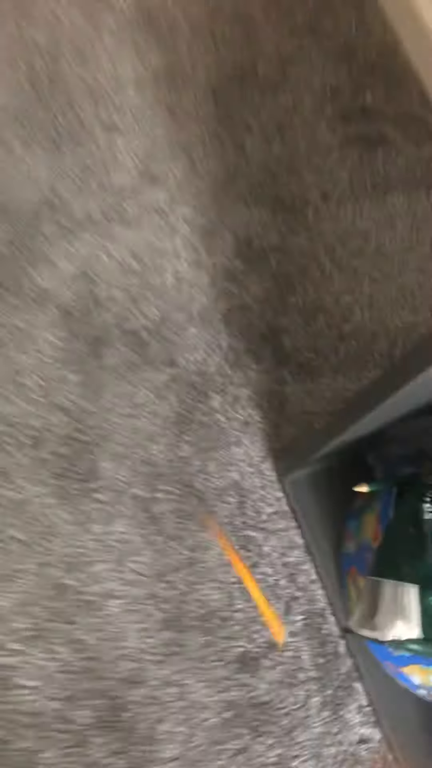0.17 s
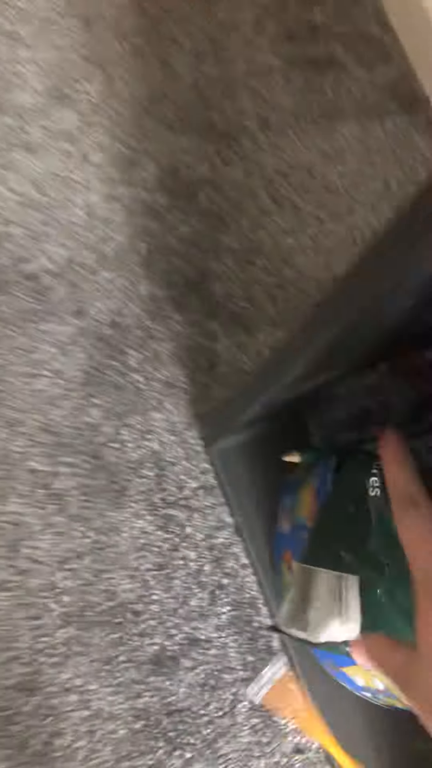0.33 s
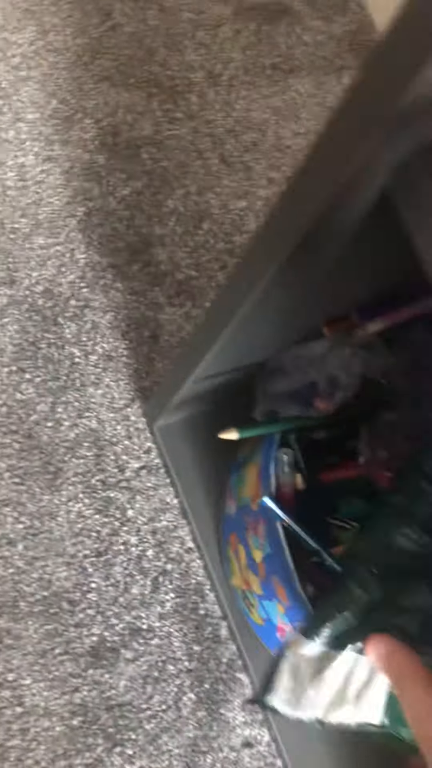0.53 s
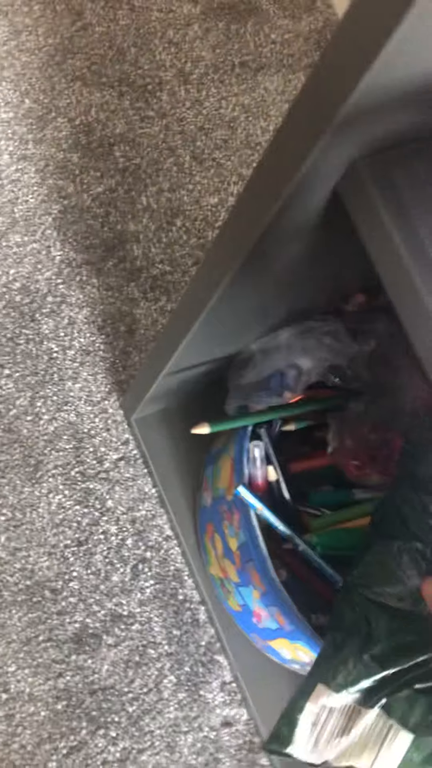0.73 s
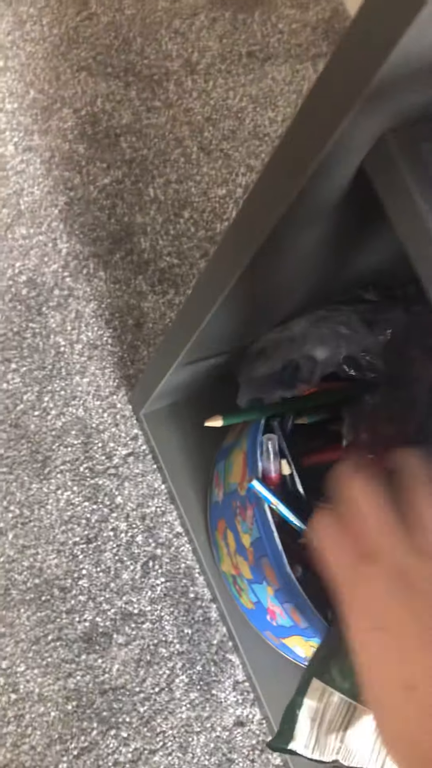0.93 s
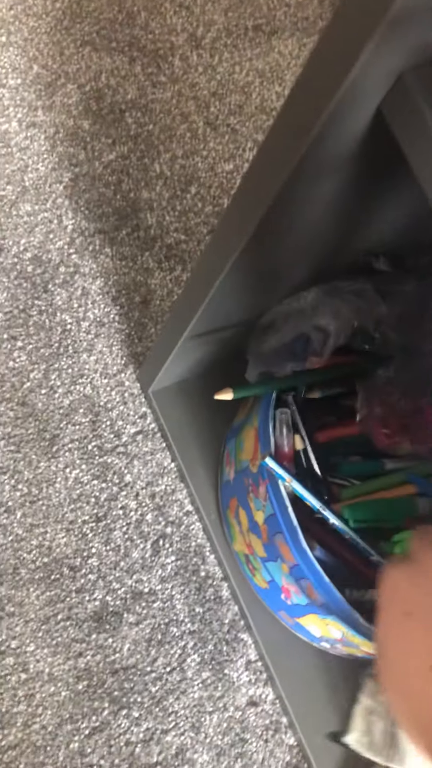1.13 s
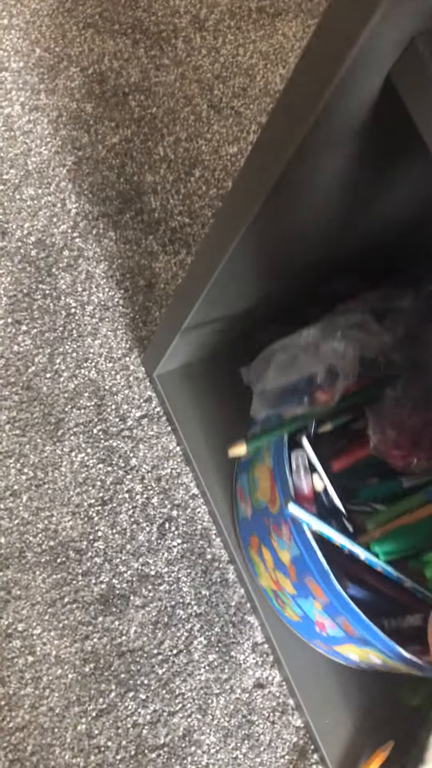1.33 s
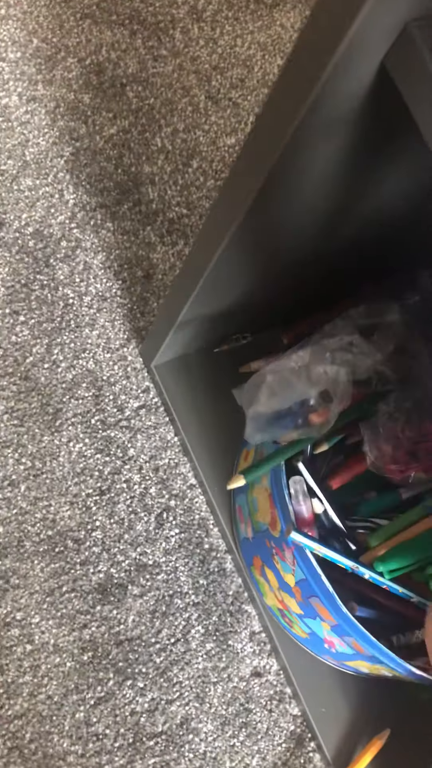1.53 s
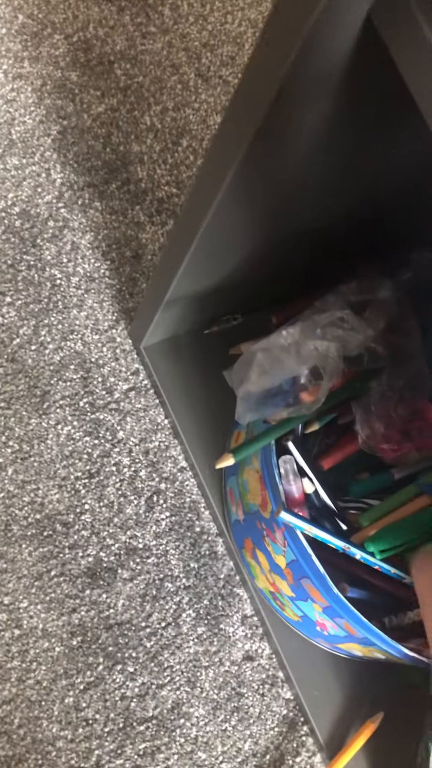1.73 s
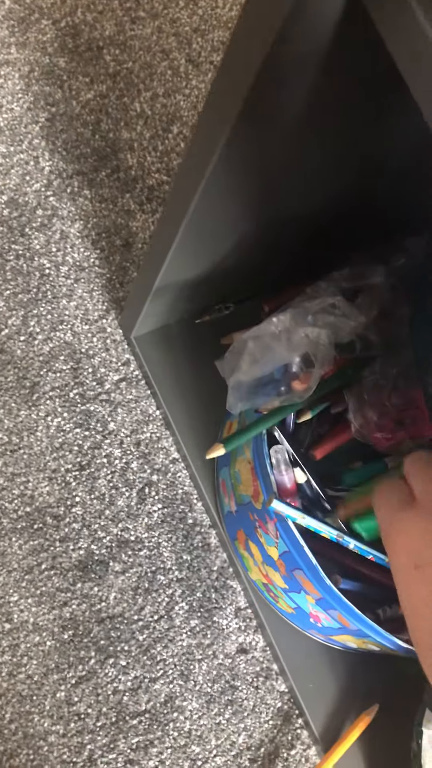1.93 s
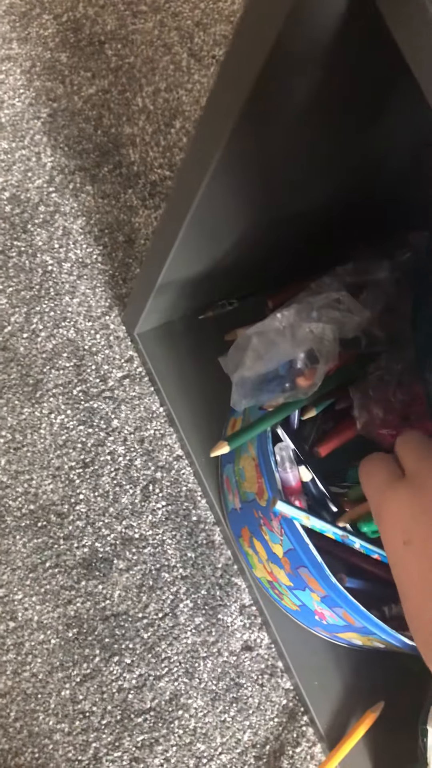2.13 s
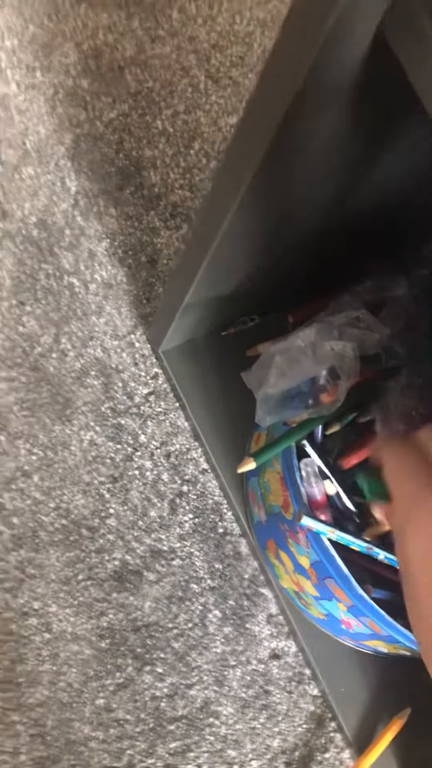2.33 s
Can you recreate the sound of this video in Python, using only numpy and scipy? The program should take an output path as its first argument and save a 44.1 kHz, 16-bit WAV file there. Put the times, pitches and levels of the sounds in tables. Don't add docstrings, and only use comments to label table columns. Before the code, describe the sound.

Pens and pencils rattle in a tin inside a drawer. A faint low bump comes near 0.1 s; from 0.3 to 1.2 s hard, irregular plastic clacks mix with crinkly bag rustle and dull drawer knocks. From 1.3 to 1.65 s pens tumble in rapid bright clicks with tiny steel pings. Faint fingertip picking follows, ending with a firmer click near 2.46 s. Close, dry, quiet room.

```python
import sys
import numpy as np
from scipy import signal
from scipy.fft import rfft, irfft, next_fast_len
from scipy.io import wavfile
from scipy.ndimage import map_coordinates

SR = 44100
rng = np.random.default_rng(int(sys.argv[2]) if len(sys.argv) > 2 else 0)


def persist_wave(psi):
    counts = np.round(np.clip(psi, -1, 1) * 32767).astype(np.int16)
    wavfile.write(sys.argv[1], SR, np.atleast_2d(counts).T)


def level_to_linear(level):
    exponent = np.asarray(level, float) / 20
    return 10 ** exponent


N = 109897


# start_s [s], clack_db [dB], hollow_knock_db [dB], sharp_snap_db [dB]
BAG_CLACKS = [(0.2401, -34.5, -44, -45.5), (0.2879, -4.5, -25, -8), (0.342, -16.5, -32, -43),
              (0.3655, -8.5, -18, -17.5), (0.373, -7.5, -51, -19), (0.3804, -12.5, -49, -19.5),
              (0.4125, -19, -41, -32), (0.4284, -14.5, -37, -38), (0.4395, -25, -25, -23.5),
              (0.4778, -22.5, -32, -20.5), (0.5439, -13.5, -31, -23), (0.5795, -27, -29.5, -21),
              (0.6584, -11, -31, -8), (0.6678, -14, -27.5, -22), (0.6893, -9.5, -20, -44),
              (0.8088, -14, -19.5, -47), (0.83, -42, -30.5, -47), (0.842, -7.5, -19.5, -25),
              (0.8694, -29.5, -26, -32), (0.89, -46, -50, -31.5), (0.9096, -20.5, -22, -31),
              (0.953, -25, -27, -43), (1.0076, -16, -27, -27), (1.0156, -9, -24.5, -14.5),
              (1.187, -24, -30, -30.5)]
TUMBLE = [(1.327, -18.5, -53, -27.5), (1.3366, -23.5, -40, -23), (1.3527, -7.5, -37, -26),
          (1.3639, -25.5, -36.5, -20), (1.3797, -17, -56, -4), (1.3893, -17, -40, -26),
          (1.4026, -21, -45, -11.5), (1.407, -9.5, -28.5, -16), (1.4103, -7, -35.5, -10),
          (1.4252, -7.5, -33, -24), (1.4364, -24, -57, -28), (1.4424, -20, -39.5, -12.5),
          (1.4515, -42, -36, -19.5), (1.4564, -9.5, -52, -12), (1.4603, -23, -27.5, -21.5),
          (1.486, -42, -54, -25), (1.5013, -26, -72, -30.5), (1.5083, -14, -46, -38),
          (1.512, -12.5, -45, -17.5), (1.533, -34, -51, -26), (1.5385, -46, -68, -25),
          (1.5508, -14.5, -34, -26), (1.5581, -10, -69, -28), (1.5654, -36, -31, -31),
          (1.595, -29, -50, -59), (1.6117, -21.5, -38, -24), (1.6158, -13, -58, -36.5),
          (1.6461, -12.5, -34, -28.5)]
PICKING = [(1.723, -32.5, -62, -36.5), (1.7345, -31, -45, -43), (1.7621, -34, -42, -43),
           (1.7754, -35, -68, -42), (1.7844, -26, -59, -38.5), (1.8086, -31, -58, -38),
           (1.8481, -31.5, -45, -65), (1.888, -35.5, -45.5, -49), (1.906, -27, -39, -44),
           (1.928, -36, -73, -45), (1.959, -28, -43, -38), (1.9906, -36, -48, -44), (1.998, -36, -44, -57),
           (2.009, -43, -43, -44.5), (2.0383, -37, -43, -57), (2.043, -45, -50, -56),
           (2.1016, -32, -42.5, -45.5), (2.111, -46, -50, -46.5), (2.144, -53, -51, -56),
           (2.1869, -36, -42, -40), (2.1931, -23.5, -37.5, -28.5), (2.208, -33, -43, -34.5),
           (2.2254, -27, -37.5, -45), (2.246, -35, -46, -45), (2.271, -26.5, -39, -41),
           (2.3004, -32, -45, -38), (2.3123, -25.5, -42, -29.5), (2.3373, -40, -43, -49),
           (2.3652, -32, -38.5, -40), (2.4315, -22.5, -40, -41), (2.4375, -40, -44, -39),
           (2.4587, -10.5, -27, -24)]
# low_hz [Hz], high_hz [Hz], crack_t60_s [s], mode_t60_s [s], level_db [dB]
BARREL = [
    (2430, 6670, 0.023, 0.022, -10.5),
    (630, 2640, 0.037, 0.04, -2),
    (7500, 14900, 0.0084, 0.015, -0.5),
]
PEN_MODES_HZ = [
    (3480, 4030, 2960, 6300),
    (970, 1137, 1900, 1700),
    (6870, 11400, 9100, 17000),
]
MODES_DB, SPIKE_DB, CHATTER_DB = -4, 11.5, 0.7


def pens():
    out, t = np.zeros(N + SR), np.arange(4096) / SR
    first_touch = np.arange(len(t)) == 8
    for start_s, *levels in [*BAG_CLACKS, *TUMBLE, *PICKING]:
        life = level_to_linear(2 * rng.standard_normal())
        roughness = np.repeat(rng.standard_normal(64), 64) * (t > .0015)
        chatter = level_to_linear(CHATTER_DB * roughness) * (1 - np.exp(-t / 0.00052))
        for level_db, modes_hz, part in zip(levels, PEN_MODES_HZ, BARREL):
            low_hz, high_hz, crack_t60, mode_t60, part_db = part
            noise = rng.standard_normal(len(t))
            detune, weakness, damping = rng.random((3, 4))
            band = signal.butter(2, [low_hz, high_hz], "band", fs=SR, output="sos")
            contact = noise * chatter * level_to_linear(-60 * t / (crack_t60 * life)) + level_to_linear(SPIKE_DB) * first_touch
            crack = signal.sosfilt(band, contact) * np.sqrt(SR / 2 / (high_hz - low_hz))
            pitches_hz = modes_hz * (1 + 0.04 * (detune - .5))
            modes = ring(pitches_hz, MODES_DB - 16 * weakness, mode_t60 * (.5 + damping), t)
            add(out, start_s, level_to_linear(level_db + part_db) * (crack + modes))
    return out[:N]


# start_s [s], peak_db [dB], pitch_hz [Hz], t60_s [s]
NOTES = [(.2879, -7.5, 4110, 0.017), (.2879, -8, 5770, 0.016), (.3660, -12.5, 4240, .015),
         (.3675, -13, 1064, 0.014), (.3745, -28, 4230, .015), (.6580, -8, 5680, .012),
         (.6895, -14, 770, .018), (.6895, -15, 2010, .012), (.8058, -18.5, 808, 0.037),
         (.8090, -10.5, 2337, 0.019), (.8095, -15, 4230, 0.014), (.2882, -16, 1910, 0.014),
         (.8140, -21, 1230, 0.017), (.8422, -17, 4620, 0.022), (.8430, -17.5, 3190, 0.034),
         (.8700, -20, 870, 0.01), (.9095, -35, 1830, 0.011), (1.0150, -19.5, 3980, 0.023),
         (1.3527, -14.5, 2130, 0.0095), (1.3527, -13, 4360, .015), (1.4070, -13.5, 3450, 0.0099),
         (1.4250, -14, 2670, 0.011), (1.4260, -15, 4020, 0.018), (1.4362, -21, 4330, 0.027),
         (1.4362, -28, 2280, 0.055), (1.4590, -16, 4200, 0.017), (1.4600, -36, 6150, 0.013),
         (1.5120, -20.5, 3600, 0.012), (1.5580, -21, 3480, 0.021), (1.6162, -22, 3610, 0.01),
         (1.8085, -32, 2170, 0.014), (1.8085, -33, 6200, 0.01), (1.9061, -31.5, 3940, 0.0092),
         (2.458, -24, 2713, 0.03), (1.9587, -21.5, 5820, 0.0045), (1.9630, -36, 1200, 0.019),
         (2.1283, -35, 1360, 0.013), (2.1577, -40, 1490, .02), (2.168, -44, 947, 0.18),
         (2.1860, -44, 2720, .015)]
NOTE_RISE_S = 0.00033


def notes():
    out, t = np.zeros(N + SR), np.arange(4096) / SR
    for start_s, peak_db, pitch_hz, t60 in NOTES:
        rough = 1 + .4 * np.repeat(rng.standard_normal(64), 64)
        rise = 1 - np.exp(-t / NOTE_RISE_S)
        add(out, start_s, ring([pitch_hz], [peak_db], [t60], t) * rough * rise)
    return out[:N]


# start_s [s], peak_db [dB]
CLIP_HITS = [
    (1.3543, -17),
    (1.381, -18),
    (1.401, -17),
    (1.4092, -8),
    (1.4524, -28),
    (1.539, -12.5),
]
# pitch_hz [Hz], level_db [dB], t60_s [s]
CLIP = [
    (8000, 2, 0.029),
    (11520, 1, 0.013),
    (14400, -19, 0.026),
]
CLIP_DB = -6


def clips():
    out, t = np.zeros(N + SR), np.arange(4096) / SR
    hz, db, t60 = np.transpose(CLIP)
    for start_s, peak_db in CLIP_HITS:
        mode_db = db + 2 * rng.standard_normal(len(hz))
        add(out, start_s, level_to_linear(peak_db + CLIP_DB) * ring(hz, mode_db, t60, t))
    return out[:N]


# start_s [s], peak_db [dB], pitch_hz [Hz], t60_s [s]
BUMPS = [(0.078, -22.5, 150, 0.19), (0.076, -23, 331, 0.18), (.0755, -30.5, 750, 0.043),
         (0.289, -31.5, 161, .05), (0.364, -25, 160, 0.034), (0.44, -13, 593, 0.017),
         (.449, -16, 268, 0.023), (0.546, -23, 213.5, 0.099), (0.642, -24.5, 205, 0.049),
         (0.69, -18.5, 558, 0.056), (.806, -37, 176, 0.077), (0.847, -28, 215, 0.17),
         (1.008, -54, 192, 0.042), (1.41, -35, 229.4, 0.24), (1.91, -44, 210, 0.087),
         (2.195, -38, 270, 0.044), (2.458, -34.5, 403, .04)]
BUMP_DB = -3.5


def drawer():
    out, puffs, t = np.zeros(N + SR), np.zeros(N + SR), np.arange(SR // 3) / SR
    for start_s, peak_db, pitch_hz, t60 in BUMPS:
        rise = level_to_linear(peak_db + BUMP_DB) * (1 - np.exp(-t / 0.00057))
        thump = ring([pitch_hz, 1.4 * pitch_hz], [3, -6], [t60, t60 / 3], t)
        add(out, start_s, rise * thump)
        puff = level_to_linear(16.5 - 60 * t / (1.38 * t60)) * rng.standard_normal(len(t))
        add(puffs, start_s, rise * puff)
    direct_and_panels = lambda hz: panels(hz) + level_to_linear(-18) / (1 + 1j * hz / 1000) ** 3
    return out[:N] + filtered(puffs[:N], direct_and_panels)


# pitch_hz [Hz], width_hz [Hz], level_db [dB]
DRAWER = [
    (88, 77, -6),
    (144, 61.6, 2),
    (218, 35.6, 2.5),
    (321, 170, -7.5),
    (584, 120, -15),
]


def panels(hz):
    total = 0
    for k, (pitch_hz, width_hz, level_db) in enumerate(DRAWER):
        damping = 1j * hz * width_hz
        total = total + (-1) ** k * level_to_linear(level_db) * damping / (pitch_hz * pitch_hz - hz * hz + damping)
    return total


# start_s [s], rustle_db [dB], brightness_db at the top [dB]
HAND = [(.03, -54, -29), (.14, -47, -42), (.286, -55.5, -26), (0.301, -42, 2), (.45, -36, -3.5),
        (.64, -32, 0), (.76, -41, -3), (.9, -42, -16.5), (1.079, -37.5, 1), (1.3, -44, -1.5),
        (1.45, -45, 2.5), (1.69, -55, -31), (1.78, -53, -13), (2.07, -66.5, -0.5), (2.13, -54.5, -9),
        (2.2, -53.5, -8), (2.35, -49.5, -1.5), (2.451, -51, -13)]
# pitch_hz [Hz], level_db [dB per Hz]
RUSTLE = [(300, -8.5), (667, -8.5), (1210, -3), (5000, -4), (15000, -12)]
FOLDS_HZ = [1, 1500, 4000, 9000, 40000]
BAG_TOUCH_S = .288
HISS_DB, RUMBLE_DB = -7, -9
CRINKLES_PER_S, CRINKLE_SPREAD_DB, CRINKLE_T60 = 170, 3.5, .008


def hand():
    start_s, *cols = np.transpose(HAND)
    rustle_db, bright_db = (np.interp(np.arange(N) / SR, start_s, c) for c in cols)
    touched = np.arange(N) > BAG_TOUCH_S * SR
    shared = level_to_linear(-7.0) * kicks(CRINKLES_PER_S / 2)
    grains = unit(sum(crinkles(low, high, shared) for low, high in zip(FOLDS_HZ, FOLDS_HZ[1:])))
    hiss = level_to_linear(HISS_DB + 2.9 * wobble(39.89) * touched) * rng.standard_normal(N)
    foil = unit(filtered(grains * touched + hiss, lambda hz: level_to_linear(along(RUSTLE, hz))))
    top = filtered(foil, lambda hz: hz ** 2 / (hz ** 2 + 6000 ** 2))
    rumble_db = RUMBLE_DB + 0.08 * (rustle_db + 32.5) + np.clip(4 * wobble(20), -12, 4)
    rumble = unit(filtered(rng.standard_normal(N), panels)) * level_to_linear(rumble_db)
    return (foil - top + level_to_linear(bright_db) * top + rumble) * level_to_linear(rustle_db + 4.0)


def crinkles(low_hz, high_hz, shared):
    snaps = shared + kicks(CRINKLES_PER_S * (1 + 3000 / high_hz))
    swell = signal.lfilter([1], [1, -level_to_linear(-60 / (CRINKLE_T60 * SR))], snaps)
    band = lambda hz: np.sqrt(1 / (1 + (hz / high_hz) ** 4) - 1 / (1 + (hz / low_hz) ** 4))
    return filtered(swell * rng.standard_normal(N), band)


def kicks(per_s):
    chance, size = rng.random((2, N))
    happens = chance < per_s / SR * level_to_linear(2.5 * wobble(25))
    return happens * level_to_linear(-CRINKLE_SPREAD_DB * np.log(size + 0.035))


# pitch_hz [Hz], t60_s [s]
ECHO = [(200, 0.11), (2000, 0.11), (10000, 0.053)]
ECHO_DB = -11.5


def echo(x):
    hz, t, z = signal.stft(rng.standard_normal(SR // 2), SR, nperseg=256)
    decay = level_to_linear(-60 * t / along(ECHO, hz)[:, None])
    tail = signal.istft(z * decay, SR, nperseg=256)[1]
    delayed = np.pad(x, (100, 0))
    return signal.fftconvolve(delayed, tail / np.linalg.norm(tail))[:N]


# pitch_hz [Hz], level_db [dB per Hz]
ROOM_TONE = [(30, 10.5), (240, 5), (1000, -19), (5000, -28), (16000, -50)]
ROOM_TONE_DB = -55.5
SWAY_DB, SWAY_T60, SWAY_HZ = -43.5, 2.5, 58.4


def room_tone():
    noise = unit(filtered(rng.standard_normal(N), lambda hz: level_to_linear(along(ROOM_TONE, hz))))
    sway = unit(filtered(rng.standard_normal(N), lambda hz: 1 / (1 + (hz / SWAY_HZ) ** 3)))
    settling = level_to_linear(SWAY_DB - 60 * np.arange(N) / SR / SWAY_T60)
    return noise * level_to_linear(ROOM_TONE_DB + 0.45 * wobble(8.2)) + sway * settling


def unit(x):
    return x / np.sqrt(np.mean(x ** 2) + 1e-20)


def along(points, hz):
    f, v = np.transpose(points)
    return np.interp(np.log(hz + 1), np.log(f + 1), v)


def wobble(rate):
    knots = rng.standard_normal(int(N / SR * 200) + 4)
    return map_coordinates(knots, [np.arange(N) * rate / SR])


def filtered(x, response):
    m = next_fast_len(x.shape[-1] + 8192)
    return irfft(rfft(x, m) * response(np.fft.rfftfreq(m, 1 / SR)), m)[..., :x.shape[-1]]


def ring(hz, db, t60, t):
    hz, db, t60 = (np.asarray(v)[:, None] for v in (hz, db, t60))
    return (level_to_linear(db - 60 * t / t60) * np.sin(2 * np.pi * hz * t)).sum(0)


def add(track, start_s, sound):
    track[round(start_s * SR):][:len(sound)] += sound


def scene():
    near = pens() + notes() + clips() + drawer() + hand()
    return (near + level_to_linear(ECHO_DB) * echo(near) + room_tone())[None]


def low_pass(x):
    return signal.sosfilt(signal.butter(12, 17020, fs=SR, output="sos"), x)


LOW_CUT_HZ, TOP_HZ, TOP = 51, 15950, .96


def record(dry):
    low_cut = lambda hz: (1j * hz / (LOW_CUT_HZ + 1j * hz)) ** 3
    heard = filtered(dry, lambda hz: low_cut(hz) / (1 + (hz / TOP_HZ) ** 240))
    heard = heard / (1 + np.abs(heard / TOP) ** 6) ** (1 / 6)
    return low_pass(heard)


dry = scene()
out = record(dry)
persist_wave(out)
```